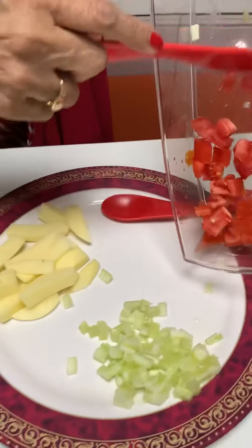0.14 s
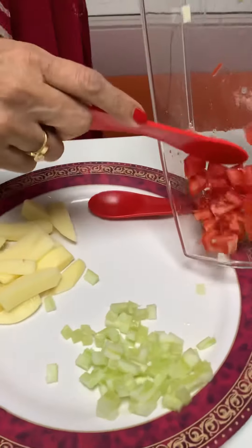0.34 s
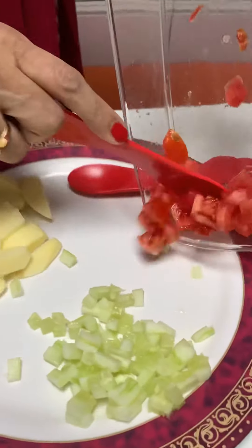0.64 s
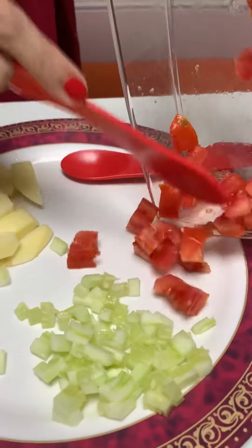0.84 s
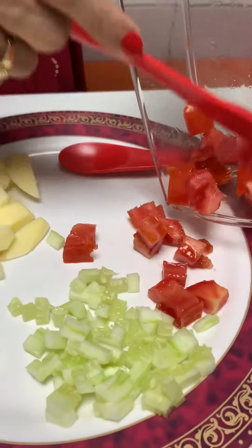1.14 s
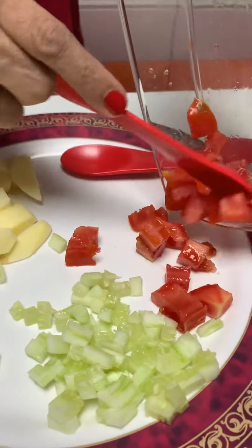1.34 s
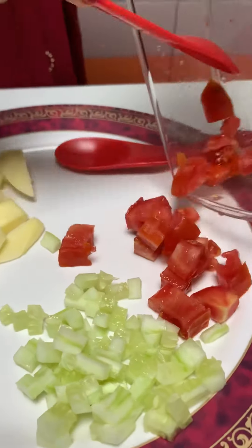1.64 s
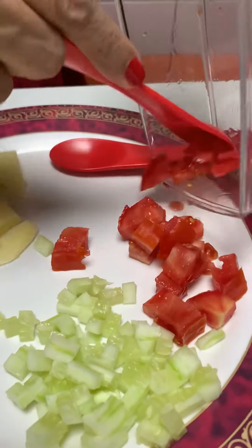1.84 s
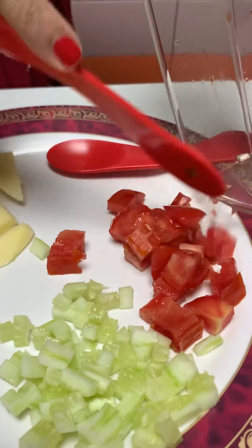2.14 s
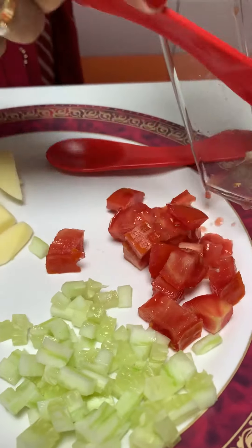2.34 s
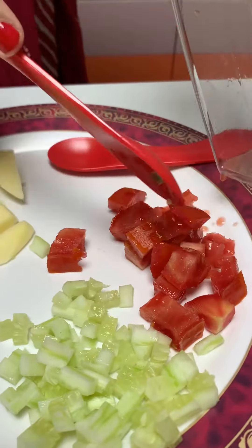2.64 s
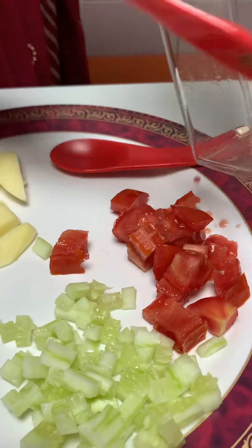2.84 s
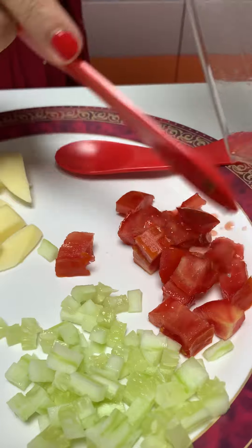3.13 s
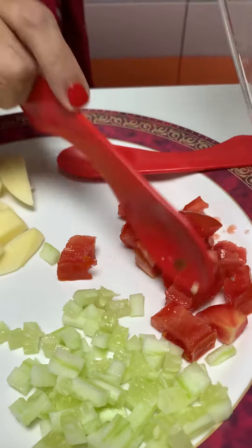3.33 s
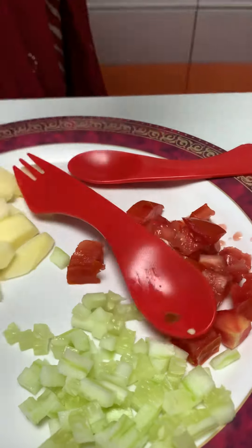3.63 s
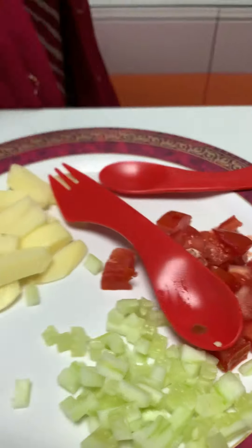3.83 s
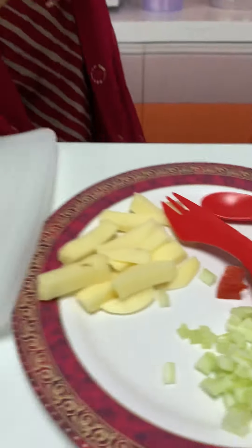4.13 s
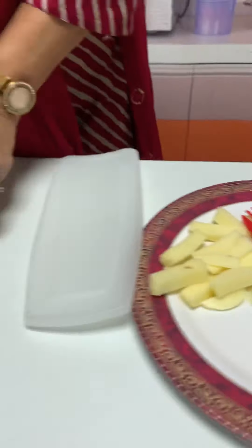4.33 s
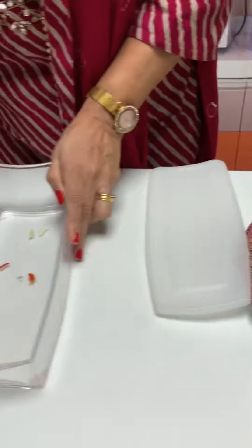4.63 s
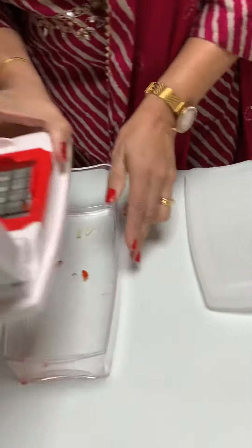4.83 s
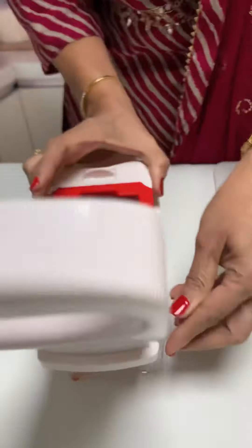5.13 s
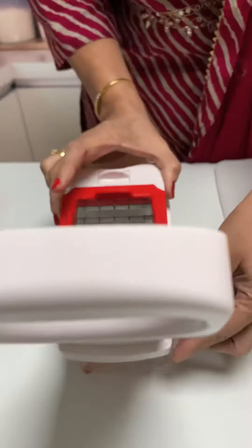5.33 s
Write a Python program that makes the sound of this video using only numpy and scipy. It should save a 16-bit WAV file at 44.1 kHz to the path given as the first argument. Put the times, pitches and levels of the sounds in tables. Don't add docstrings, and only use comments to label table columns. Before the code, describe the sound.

Close phone pickup in a small, lively kitchen: a plastic fork strikes a hand-held thin plastic tub with irregular hard clacks and light ticks, wet gritty scrapes between, food dropping softly. After a quieter gap, the tub judders across the table, lands with a low boom, and a hollow plastic lid rustles and thumps on. Faint house rumble throughout.

```python
import sys
import numpy as np
from scipy import signal
from scipy.fft import rfft, irfft, next_fast_len
from scipy.io import wavfile
from scipy.ndimage import uniform_filter1d

SR = 44100
rng = np.random.default_rng(int(sys.argv[2]) if len(sys.argv) > 2 else 0)


def file_out(sig):
    cols = np.atleast_2d(sig).T
    lim = np.clip(cols, -1, 1)
    pcm = np.round(lim * 32767).astype(np.int16)
    wavfile.write(sys.argv[1], SR, pcm)


def makeup_ratio(level_db):
    decades = np.asarray(level_db, float) / 20
    return 10 ** decades


N = 241303

# [f/Hz, t60/s]
TUB_MODES = [(375, 0.36), (425, 0.37), (510, 0.29), (590, 0.21), (673, 0.41), (812, 0.15), (895, 0.16),
             (950, 0.24), (995, 0.064), (1100, 0.077), (1310, 0.11), (1410, 0.27), (1560, 0.064),
             (1725, 0.042), (1980, 0.073), (2150, 0.023), (2305, 0.11), (2570, 0.038), (2900, 0.076),
             (3185, 0.058), (3400, 0.028), (3700, 0.025), (4050, 0.033), (4400, 0.014)]
# [t/s, peak level/dB, crack level/dB, contact/ms, ring share 0-1]
FORK_BLOWS = [(0.0531, -1, -20, 2.4, 0.7), (0.16, -4, -39.5, 1.33, 0.6), (0.698, -18.5, -30, 6.7, 0.64),
              (1.214, -16, -15, 9.7, 0.7), (1.5825, -5, -14.5, 3.1, 0.2), (1.5875, -7.5, -12.5, 0.78, 0.5),
              (1.589, -6.5, -31, 2.5, .5), (1.828, -16, -27.5, 7.1, 0.73), (2.394, -17, -9, 2.1, 0.5),
              (2.396, -6, -16, 10, 0.6), (2.945, -11.5, -6, 3, 0.6), (2.95, -1.5, -17, 2.4, 0.8)]
# [t/s, peak level/dB, favoured f/Hz, crack level/dB, low wall level/dB]
FORK_KNOCKS = [(0.305, -20.5, 814, -22.5, -17), (0.333, -47.5, 900, -8, -6), (0.398, -50, 676, -5.5, 10.5),
               (0.429, -27.5, 804, -19.5, -2), (0.471, -35, 693, -15, -79), (0.533, -21, 1188, -23, 8.5),
               (0.617, -50.5, 1100, -8, -5), (0.672, -41.5, 1097, -7, -6), (0.786, -30.5, 1100, -25, 12),
               (0.8, -51, 1330, -37, 5), (1.087, -48.5, 995, -54, -27), (1.319, -25, 688, -39, -7.5),
               (1.502, -42, 1960, -27.5, -16), (1.807, -45, 2100, -9.5, 2), (1.813, -41.5, 2100, -10.5, 4),
               (1.918, -27.5, 1933, -24, -24), (1.938, -38, 682, -15.5, -3), (1.972, -44, 658, -15.5, -8.5),
               (2.041, -50, 1700, -8.5, -5.5), (2.059, -25, 2119, -40.5, -19),
               (2.063, -32, 940, -35, -20.5), (2.131, -43.5, 2130, -26, -7.5), (2.458, -29, 963, -33, -36),
               (2.484, -43.5, 698, -22.5, -16), (3.428, -30, 1165, -25.5, -63),
               (3.541, -47.5, 1098, -24, -1.5)]
# [t/s, peak level/dB, favoured f/Hz, crack level/dB, low wall level/dB]
TABLE_THUDS = [
    (4.107, -42.5, 1250, -32, -19),
    (4.3, -31.5, 1600, -13.5, 2),
    (4.457, -27.5, 440, -23.5, 17),
    (4.473, -32, 690, -21, 11.5),
    (4.646, -18, 1470, -30.5, -29.5),
    (4.739, -31.5, 650, -24, 1),
    (5.332, -27.5, 1340, -19, -43),
    (5.45, -33.5, 660, -23, -37),
]
# [t/s, peak level/dB, crack level/dB, contact/ms]
HEAVY_THUMPS = [
    (4.649, -11.5, -39, 6.1),
    (4.662, -16.5, -58, 5.8),
    (5.34, -21, -9, 6),
]
RIM_SHARE = .45
LONGEST_RING_S = .13
LEAD = 64


def unit(x):
    return x / np.sqrt(np.mean(x ** 2))


def on_hz(table, hz):
    f, v = np.transpose(table)
    return np.interp(np.log(hz + 1), np.log(f + 1), v)


def colour(x, table):
    size = next_fast_len(x.shape[-1])
    gain = makeup_ratio(on_hz(table, np.fft.rfftfreq(size, 1 / SR)))
    return irfft(rfft(x, size) * gain, size)[..., :x.shape[-1]]


def walk(rate):
    k = int(SR / rate)
    held = np.repeat(rng.standard_normal(N // k + 1), k)
    return unit(uniform_filter1d(uniform_filter1d(held, k), k)[:N])


def add(out, x, s):
    i = int(s * SR)
    out[i:i + len(x)] += x[:N - i]


def slow_time():
    return np.arange(0, N, 32) / SR


def full(gain):
    return uniform_filter1d(np.repeat(gain, 32), 32)[:N]


def course(rows, axis=1):
    return np.interp(slow_time(), *np.array(rows).T[[0, axis]])


def ramp(s, length, rise, fall, change_db=0):
    t = slow_time() - s
    outside = rise * np.minimum(t, 0) - fall * np.maximum(t - length, 0)
    return makeup_ratio(outside + change_db * np.clip(t / length, 0, 1))


def ring(hz, gain, t60):
    t = np.float32(np.arange(SR // 8) / SR)
    omega = np.float32(2 * np.pi * hz[:, None])
    decay_s = np.float32(t60[:, None] / np.log(1000))
    sense = (-1) ** np.arange(len(hz))
    return (gain * sense) @ (np.sin(omega * t) * np.exp(-t / decay_s))


def spot_db(share):
    wall_db = [-9.5, -7, -2, -36, -5.5, -18.5, -19, -12, -4.5, -1, -8, -10.5, -8.5, -11.5, -11.5, -12, -20,
               -8, -20.5, -28, -21.5, -17.5, -22.5, -15.5]
    rim_db = [-19.5, -13.5, -17.5, -38, 0, -5, -11.5, 5, -1.5, -24.5, -18.5, -21.5, -7, -5, -6.5, -0.5, -6,
              -16, -14.5, -3.5, -12.5, -22.5, -18.5, -17.5]
    share = np.clip(share, 0, 1)
    return (1 - share) * np.array(wall_db) + share * np.array(rim_db)


def swing(modes):
    hz, db, t60 = np.transpose(modes)
    t60 = np.clip(t60, .012, .125)
    return hz, db + 20 * np.log10(t60 / .1), t60


def strike(hz, mode_db, t60, contact_ms, crack_db, fizz, fizz_s, size=3):
    # [f/Hz, level/dB]
    crack_spectrum = [(500, -40), (1800, 0.5), (4000, 2.5), (7000, -4), (10000, -12.5), (13000, -12.5),
                      (16000, -30.5)]
    t, grit = np.arange(2048) / SR, rng.standard_normal((2, 2048))
    touch = np.exp(-(1000 * t / max(contact_ms, .3)) ** 2) * np.minimum(t / .0006, 1)
    push = uniform_filter1d(uniform_filter1d(grit[0], size), size) * touch
    pairs = 2 * len(hz)
    detune = np.tile([.002, .02], len(hz)) * rng.choice([-1, 1], pairs) * rng.uniform(.6, 1.4, pairs)
    hz = np.repeat(hz, 2) * (1 + detune)
    gain = np.repeat(makeup_ratio(mode_db) / t60, 2) * np.tile([1, .45], len(t60))
    bins = np.rint(hz * 16384 / SR).astype(int)
    drive = np.abs(rfft(push, 16384))[bins] / np.sqrt(np.sum(push ** 2))
    body = signal.fftconvolve(ring(hz, gain / (drive + .15), np.repeat(t60, 2)), push)
    body_t = np.arange(len(body)) / SR
    body = body * (0.72 + np.exp(-(body_t / 0.013) ** 2))
    k = np.arange(32)
    body = body * makeup_ratio(3 * np.interp(body_t * 110, k, grit[1, :32] * (k > 0)))
    spikes = grit[1] * np.abs(grit[0]) * (touch + fizz * np.exp(-t / fizz_s))
    crack = colour(np.roll(spikes, LEAD), crack_spectrum)
    body = np.pad(body / np.abs(body).max(), (LEAD, 0))
    return body + np.pad(makeup_ratio(crack_db) * crack / np.abs(crack).max(), (0, len(body) - 2048))


def taps(events, hz, mode_db, t60, focus_db, spread, crack_db, fizz, fizz_s, size, touch_ms):
    out = np.zeros(N)
    for s, db, spot_hz, top_db, low_db in events:
        contact_ms = touch_ms - 0.04 * low_db
        focus = focus_db * np.exp(-(np.log(hz / spot_hz) / spread) ** 2)
        weight_db = mode_db + focus + 1.4 * rng.standard_normal(len(hz))
        weight_db = weight_db + np.where(hz < 600, low_db + 12, 0)
        hit = strike(hz, weight_db, t60, contact_ms, top_db + crack_db, fizz, fizz_s, size)
        add(out, makeup_ratio(db) * hit, s - LEAD / SR)
    return out


def air():
    # [f/Hz, level/dB per Hz]
    air_spectrum = [(190, -23), (330, -9), (520, -9.5), (576, -22.5), (762, -13), (3110, -31.5),
                    (4770, -29.5), (5940, -33), (8320, -32), (11000, -32), (14300, -57), (22000, -120)]
    # [f/Hz, level/dB per Hz]
    hum_spectrum = [(12, -41.5), (20, -12.5), (27, -5), (42, -2), (54, 1), (71, -1), (92, 5.5), (133, -1),
                    (193, 0.5), (219, -6.5), (246, -1.5), (343, -11.5), (420, -8.5), (550, -30),
                    (920, -120)]
    # [t/s, level/dB]
    house_activity = [(0.0, -51), (0.38, -61.5), (1.2, -55), (1.57, -55.5), (2.0, -54.5), (2.68, -72.5),
                      (3.03, -61.5), (3.75, -63.5), (4.02, -60.5), (4.42, -66), (4.77, -53), (5.47, -61)]
    treble_db = air_spectrum[-3][1] - 9
    top = [(13000, treble_db), (15700, treble_db), (16100, -90)]
    hush = unit(colour(rng.standard_normal((2, N)), air_spectrum[:-2] + top)) * makeup_ratio(-72.5 + .6 * walk(29))
    activity_db = course(house_activity)
    fade_db = 1.18 * np.arange(N) / SR
    hum_db = -50 + 0.44 * (full(activity_db) + 56.5) - fade_db + 1.5 * walk(3.4)
    hum = unit(colour(rng.standard_normal((2, N)), hum_spectrum)) * makeup_ratio(hum_db)
    rumble = unit(colour(rng.standard_normal(N), [(35, -41.5), (54, -5.5), (61, 10.5), (69, 0.5), (100, -51.0)]))
    shared = hush[0] + hum[0] + rumble * full(makeup_ratio(activity_db + 1.0))
    return shared, makeup_ratio(2) * hush[1] + makeup_ratio(-5.0) * hum[1]


def fridge():
    phase = 2 * np.pi * 283.5 * np.arange(N) / SR + 0.42 * walk(42)
    return makeup_ratio(-61.5 + 2.5 * walk(18)) * np.sin(phase)


def blows():
    blow_spot = [0, 1, 2, 3, 4, 4, 4, 5, 6, 6, 7, 7]
    # [f/Hz, level/dB, t60/s]
    early_spots = [
        [(389, -5, 0.093), (1017.4, 4, 0.093), (1760, -13, 0.067), (2159, -16.5, 0.055), (2580, -17, 0.053),
         (3128, -19.5, 0.07), (3289, -15.5, 0.036), (3770, -25, 0.12), (4200, -38, 5.0), (4409, -29.5, 0.074)],
        [(356, -18.5, 5.0), (495, 1, 0.18), (1044, -0.5, 0.21), (1283, -11, 0.2), (1655, -9, 0.064),
         (1740, -11, 0.057), (1863, -14.5, 0.05), (2040, -13.5, 0.084), (2243, -19.5, 0.059), (3418, -23, 5.0),
         (4160, -27, 0.21)],
        [(416, -5, 5.0), (678.5, -6.5, 0.14), (1085, -4.5, 0.0936), (1637, -6.5, 0.075), (2270, -6.5, 0.076),
         (2594, -6.5, 0.04), (2780, -22, 0.55), (3906, -23, 0.15)],
        [(371, -15.5, 0.85), (920, -3, 0.064), (1291, -17.5, 0.059), (1540, -6.5, 0.18), (2330, -20.5, 5.0),
         (2972, -21, 0.24), (3700, -8.5, 0.077), (4054, -6.5, 0.032), (4495, -20.5, 0.034)],
    ]
    # [f/Hz, level/dB, t60/s]
    late_spots = [
        [(431, -18, 0.19), (670.6, -2, 0.056), (958, -5.5, 0.14), (1265, -22, 0.073), (1420, -22, 0.19),
         (1554, -10, 0.063), (1730, -18.5, 0.16), (2175, -11, 0.08), (3120, -15, 0.072), (3770, -25.5, 0.13),
         (3970, -32, 0.2), (4040, -24.5, 0.13), (4200, -9, 0.033)],
        [(393, -4, 0.33), (506, -11.5, 0.16), (943, -18.5, 0.068), (1455, 0, 0.014), (2110, -6, 0.073),
         (2630, -37, 0.34), (3758, -40, 0.13), (4161, -37, 0.061)],
        [(506, -15, 0.17), (678, -1, 0.15), (920, -8, 0.21), (1380, -26.5, 0.37), (1553, -7, 0.12),
         (1739, -0.5, 0.061), (2078, -16.5, 0.11), (2256, -11, 0.068), (2562, -21, 0.2), (3100, -25, 0.2),
         (3451, -30, 0.22), (3984, -30, 0.1), (3900, -31, 0.23)],
        [(445, -5.5, 0.12), (700, -8, 0.089), (957, -8.5, 0.22), (1410, -20, 0.18), (1550, -7, 0.23),
         (1718, -6, 0.34), (1944, 1.5, 0.051), (2169, -4.5, 0.061), (3166, -0.5, 0.17), (3680, -17, 0.14),
         (3750, -13.5, 0.071), (4000, -6, 0.07), (4150, -11.5, 0.049)],
    ]
    rim_shares = [.05, .1, 0.075, .1, .9, 0.054, 1, 1]
    whole_tub_db = [-9, -3.5, -2.5, -4, -7, -9.5, -4.5, -3]
    out, (hz, t60) = np.zeros(N), np.transpose(TUB_MODES)
    for (s, db, top_db, contact_ms, share), spot in zip(FORK_BLOWS, blow_spot):
        own_hz, own_db, own_t60 = swing((early_spots + late_spots)[spot])
        taken_db = -40 * (np.abs(np.log(hz[:, None] / own_hz)).min(axis=1) < .045)
        rest_db = whole_tub_db[spot] + spot_db(rim_shares[spot]) + taken_db
        rest_t60 = np.clip(t60 * 2 * share, .01, LONGEST_RING_S)
        modes = np.r_[own_hz, hz], np.r_[own_db, rest_db], np.r_[own_t60, rest_t60]
        add(out, makeup_ratio(db) * strike(*modes, contact_ms, top_db + 19.5, 0.29, 0.007), s - LEAD / SR)
    return out


def kitchen(x):
    # [f/Hz, t60/s]
    room_t60 = [(250, 0.41), (700, 0.43), (2000, 0.27), (5000, 0.3), (12000, 0.043)]
    t, tails = np.arange(SR * 2 // 3) / SR, 0
    for hz in 125 * 2 ** np.arange(7):
        octave = [(hz / 2, -30), (hz / 1.4, 0), (hz * 1.4, 0), (hz * 2, -30)]
        band = colour(rng.standard_normal((2, len(t))), octave)
        tails = tails + band * makeup_ratio(-60 * t / on_hz(room_t60, hz))
    tails = tails * np.clip((t - .003) / 0.004, 0, 1)
    return signal.fftconvolve(x[None], tails / np.sqrt(np.sum(tails[0] ** 2)), axes=1)[:, :N]


def contact():
    # [t/s, length/s, wet hiss level/dB, tub hum level/dB, hiss change/dB]
    strokes = [(0.089, 0.089, -52, -48, 8.5), (0.224, 0.3, -63, -64.5, 0.5), (0.632, 0.095, -60, -58, -10),
               (.78, 0.015, -62, -78, 1), (0.86, 0.24, -87.5, -70.5, 6.5), (1.236, .13, -49.5, -52, -7.5),
               (1.657, 0.18, -66.5, -58, 18.5), (1.896, 0.12, -72.5, -79, 17.5),
               (2.045, 0.011, -50.5, -57.5, -31), (3.315, 0.065, -60, -67.5, 15.5),
               (3.439, 1.22, -81, -75, 0.5), (3.568, 0.28, -69.5, -70.5, -4), (4.059, 0.022, -74, -88, 4.5),
               (4.132, 0.11, -85, -73.5, 1), (4.301, 0.093, -67, -63, -15), (4.88, 0.11, -68.5, -71, -2),
               (5.024, 0.27, -68, -62.5, -8), (5.378, 0.067, -87.5, -69, 3)]
    rise, fall = 445, 480
    hiss = hum = 0
    for s, length, hiss_db, hum_db, change_db in strokes:
        hiss = hiss + makeup_ratio(hiss_db) * ramp(s, length, rise, fall, change_db)
        hum = hum + makeup_ratio(hum_db) * ramp(s, length, rise, fall)
    heavy = [row[:3] for row in FORK_BLOWS + HEAVY_THUMPS]
    light = [(row[0], row[1], row[3]) for row in TABLE_THUDS + FORK_KNOCKS]
    for s, db, crack_db in heavy + light:
        skid = ramp(s - .004, .003, 1199.5, 5000)
        rattle = ramp(s + .012, .003, 5000, 194)
        force = makeup_ratio(db + 0.65 * crack_db)
        hiss = hiss + force * (makeup_ratio(-45.5) * skid + makeup_ratio(-38.5) * rattle)
        hum = hum + force * (makeup_ratio(-20.5) * skid + makeup_ratio(-30) * rattle)
    return full(hiss), full(hum)


def scrape():
    # [f/Hz, level/dB]
    hiss_spectrum = [(2000, -22), (4400, -7.5), (5600, 7), (7000, -0.5), (10000, -10), (13000, -8),
                     (15600, -14.5), (16100, -38.5)]
    slips = rng.standard_normal((2, N)) * makeup_ratio(2.6 * rng.exponential(size=(2, N)))
    hiss = unit(colour(slips[0], hiss_spectrum))
    coarse, grit_db = colour(hiss, [(7500, 0), (9000, -30)]), 3
    hiss = coarse * makeup_ratio(grit_db * walk(45)) + (hiss - coarse) * makeup_ratio(grit_db * walk(29))
    hiss_gain, hum_gain = contact()
    out = hiss * hiss_gain * makeup_ratio(-2.0)
    push = unit(slips[1]) * hum_gain * makeup_ratio(2.6 * walk(40))
    hz, t60 = np.transpose(TUB_MODES)
    late = np.arange(N) / SR > 3.1
    for part, tilt in ((~late, 1.3), (late, 2)):
        body = ring(hz, makeup_ratio(spot_db(RIM_SHARE)) * (hz / 1500) ** tilt, .4 * t60)
        out = out + signal.fftconvolve(push * part, body / np.sqrt(np.sum(body ** 2)))[:N]
    return out


def knocks():
    hz, t60 = np.transpose(TUB_MODES)
    ring_s = np.minimum(.5 * t60, LONGEST_RING_S)
    return taps(FORK_KNOCKS, hz, spot_db(RIM_SHARE), ring_s, focus_db=17.5, spread=0.15,
                crack_db=13.0, fizz=0.63, fizz_s=0.037, size=3, touch_ms=2.2)


def booms():
    # [t/s, swell/s, modes [f/Hz, level/dB, t60/s]]
    table_booms = [
        (.7, 0.1, [(185.7, -43, 1), (227, -43, 0.64)]),
        (4.646, -2.5, [(114.5, -43, .7), (160, -38, .5), (194.6, -46.5, 0.54)]),
    ]
    # (t/s, swell/s, modes [f/Hz, level/dB, t60/s])
    lid_boom = (5.342, .007, [(114.6, -29.5, 1.6), (161.6, -28, 1.6), (197, -29, .35)])
    out, t = np.zeros(N), np.arange(SR // 2) / SR
    for s, swell, modes in table_booms + [lid_boom]:
        hz, db, t60 = np.transpose(modes)[:, :, None]
        sense = (-1) ** np.arange(len(hz))[:, None]
        partials = sense * makeup_ratio(db - 60 * t / t60) * np.sin(2 * np.pi * hz * t)
        add(out, np.sum(partials, axis=0) * (1 - np.exp(-t / swell)), s)
    return out


def plops():
    # [t/s, level/dB, f/Hz]
    landings = [(0.922, -37.5, 390), (1.016, -38.5, 570), (1.444, -27.5, 510), (2.345, -28.5, 360),
                (2.367, -38, 681), (2.732, -43, 561), (3.244, -24.5, 515.4), (3.726, -39.5, 368),
                (3.759, -33, 432), (3.78, -53, 359.3), (4.054, -37.5, 372), (4.153, -37, 468),
                (4.2, -41, 540), (4.26, -42.5, 562), (4.277, -68, 354), (4.328, -70, 384), (4.88, -33, 460)]
    out, t = np.zeros(N), np.arange(1500) / SR
    for s, db, hz in landings:
        phase = 2 * np.pi * hz * 1.2 * (t - 25 * t ** 2)
        add(out, makeup_ratio(db - 0.5) * np.sin(phase) * (t / 0.012) * np.exp(1 - t / 0.0028), s - .001)
    return out


def drag():
    drone_hz = [110.3, 140, 157, 198.2]
    drone_db = [0.12, -0.86, -1, 0.33]
    # [t/s, level/dB]
    drag_force = [
        (4.08, -77.5),
        (4.138, -56),
        (4.3, -59.5),
        (4.45, -51),
        (4.55, -48),
        (4.619, -56),
        (4.7, -40),
        (4.885, -64.5),
        (4.969, -74),
    ]
    # [t/s, level/dB, length/s]
    judders = [(4.15, -44, 0.017), (4.224, -49, .02), (4.294, -45, 0.017), (4.334, -43, 0.016),
               (4.367, -36, .012), (4.405, -36.5, 0.019), (4.442, -33.5, .012), (4.472, -43, 0.011),
               (4.497, -28.5, 0.014), (4.522, -36, 0.017), (4.549, -29.5, 0.017), (4.582, -45, 0.009),
               (4.629, -43, .012), (4.868, -43.5, .02)]
    # [t/s, f/Hz]
    judder_pitch = [
        (4.1, 174.1),
        (4.2, 152),
        (4.3, 147.7),
        (4.37, 159.2),
        (4.42, 136),
        (4.5, 139.5),
        (4.56, 137.4),
        (4.63, 134.4),
        (4.9, 119.3),
    ]
    t, out = np.arange(N) / SR, 0
    for hz, mode_db in zip(drone_hz, drone_db):
        out = out + np.sin(2 * np.pi * hz * t + 1.0 * walk(4.7)) * makeup_ratio(mode_db + 5.3 * walk(22))
    start, end = drag_force[0][0], drag_force[-1][0]
    out = out * full(makeup_ratio(course(drag_force)) * ramp(start, end - start, 500, 500))
    jerks = sum(makeup_ratio(db) * np.exp(-((slow_time() - s) / length) ** 2) for s, db, length in judders)
    phase = 2 * np.pi * np.cumsum(full(course(judder_pitch))) / SR
    return out + np.sin(phase) * full(jerks)


def thuds():
    # [f/Hz, level/dB, t60/s]
    table_modes = [(290, 8.0, 0.14), (415, 2, 0.51), (517, -8.0, 0.54), (543, -22.0, 0.47),
                   (704, 7.5, 0.54), (808, -15.5, 0.49), (956, 5.5, 0.45), (1086, -3.0, 0.16),
                   (1081, -18.5, 0.67), (1100, -10, 0.47), (1317, 0, 0.2), (1526, -8.0, 0.076),
                   (1590, -2, 0.31), (1647, 3.5, 0.48), (1750, -36.5, 0.62), (1807, -3.0, 0.1),
                   (2140, 5.5, 0.32), (2450, -13.0, 0.084), (2528, -9.5, 0.094), (3040, -38, 0.13)]
    hz, db, t60 = np.transpose(table_modes)
    return taps(TABLE_THUDS, hz, db, .33 * np.minimum(t60, .3), focus_db=12, spread=.33,
                crack_db=4.5, fizz=0.37, fizz_s=0.0066, size=13, touch_ms=5)


def thumps():
    # [f/Hz, level/dB, t60/s]
    thump_modes = [
        [(468, -3.5, 0.081), (558, -9, 0.26), (667.5, 0, 0.096), (974, -2.5, 0.21), (1086, -4.5, 0.27),
         (1178, -9, 0.21), (1312, -3, 0.1), (1416, -10.5, 0.076), (1478, -20, 5.0), (1620, -30.5, 0.31),
         (1841, -8.5, 0.07), (2128, -4.5, 0.047), (2760, -38.5, 0.11), (3080, -44, 0.14)],
        [(463, -18, 1.1), (667, -2.5, 0.1), (750, -19, 0.47), (996, -18, 0.41), (1203, -15, 0.52),
         (1450, -17, 0.39), (2110, -15.5, 0.076), (2630, -14.5, 0.054), (3720, -41, 1.6), (4400, -23, 0.031)],
    ]
    thump_body = [0, 0, 1]
    out = np.zeros(N)
    for (s, db, top_db, contact_ms), body in zip(HEAVY_THUMPS, thump_body):
        hit = strike(*swing(thump_modes[body]), contact_ms, top_db + 2.0, .4, 0.0046, size=9)
        add(out, makeup_ratio(db) * hit, s - LEAD / SR)
    return out


def rustle():
    # [f/Hz, width/Hz, level/dB]
    lid_resonances = [(1730, 91, -4.5), (2150, 40, -5), (3370, 69, -4.5), (3620, 53, -4), (4040, 160, -0.5),
                      (5210, 120, -12), (7100, 130, -9.5), (8860, 170, -17.5)]
    size = next_fast_len(N)
    f = np.fft.rfftfreq(size, 1 / SR)
    power = sum(makeup_ratio(2 * db) / (1 + (2 * (f - hz) / width) ** 2) for hz, width, db in lid_resonances)
    noise = unit(irfft(rfft(rng.standard_normal(N), size) * np.sqrt(power), size)[:N])
    return noise * makeup_ratio(-62.5 + 1.8 * walk(22)) * full(ramp(5.03, 0.14, 300, 400))


def two_ports(shared):
    # [f/Hz, phase/rad]
    port_phase = [(0, 0), (1030, .5), (1550, .5), (2330, 2.1), (3190, 2.2), (4050, 1.9), (4390, 2.5),
                  (5050, 3.14), (7670, 6.1), (9560, 6.6), (11200, 8.7), (12500, 9.42), (13700, 10.7),
                  (15100, 12.4), (16500, 12.6)]
    # [f/Hz, level/dB]
    port_db = [(200, .3), (380, -.3), (700, -2.2), (1290, -2.2), (2380, -5.5), (4400, -.3), (8000, 0)]
    size = next_fast_len(N + 4096)
    hz = np.fft.rfftfreq(size, 1 / SR)
    half = makeup_ratio(on_hz(port_db, hz) / 2) * np.exp(.5j * np.interp(hz, *np.transpose(port_phase)))
    return irfft(rfft(shared, size) * np.array([half, 1 / half]), size)[:, :N]


def scene():
    hush, other_hush = air()
    fork = blows() + knocks()
    table = thuds() + thumps()
    high_pass = signal.butter(6, 335, "high", fs=SR, output="sos")
    fork, table = signal.sosfilt(high_pass, [fork, table])
    wet = kitchen(makeup_ratio(-15.0) * fork + makeup_ratio(-9.0) * table)
    drone = drag() + booms()
    table_top = np.array([drone, np.roll(drone, 20)])
    pair = two_ports(fork + table + scrape() + rustle() + wet[0] + hush)
    apart = colour(wet[1], [(250, -7.0), (600, 0.0), (2000, -2.5), (4000, -14.0), (9000, -11.0)])
    apart = apart + colour(other_hush, [(60, -15.5), (300, -1.5), (700, 3.5), (2500, -2.5), (6000, -13.0)])
    return pair + plops() + fridge() + table_top + apart * np.array([[1], [-1]])


def roll_off(x):
    return signal.sosfilt(signal.butter(12, 16970, fs=SR, output="sos"), x)


def record(dry):
    held = dry / (1 + np.abs(dry / .85) ** 6) ** (1 / 6)
    return roll_off(held)


dry = scene()
out = record(dry)
file_out(out)
```